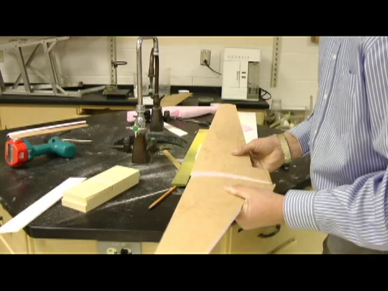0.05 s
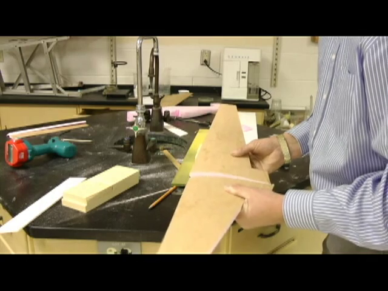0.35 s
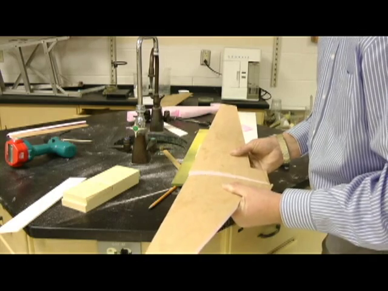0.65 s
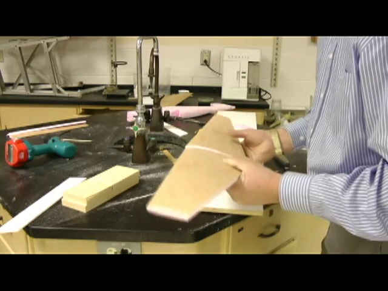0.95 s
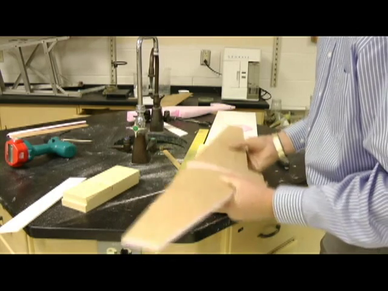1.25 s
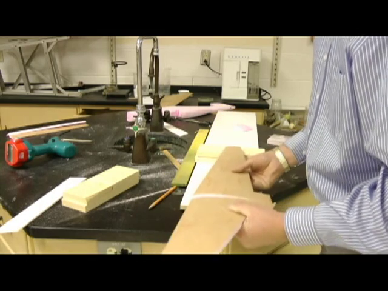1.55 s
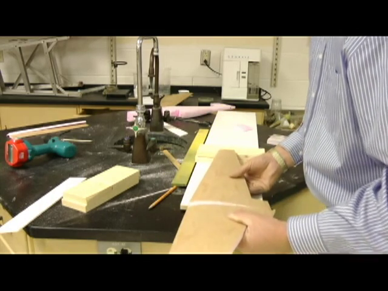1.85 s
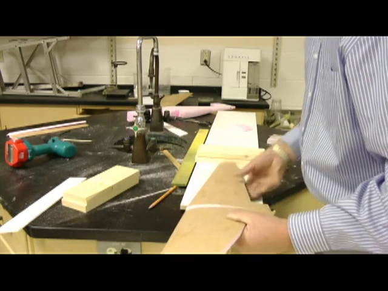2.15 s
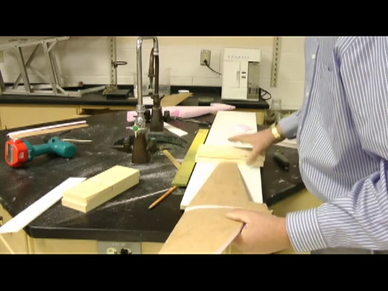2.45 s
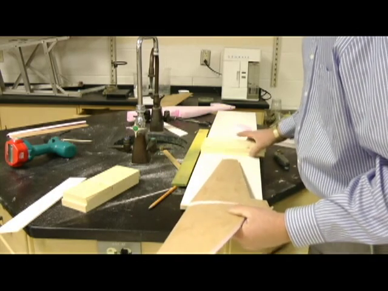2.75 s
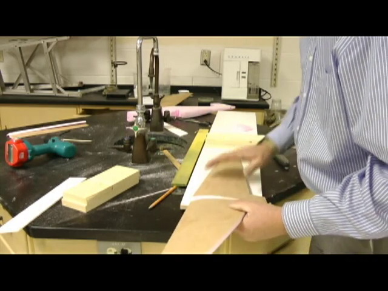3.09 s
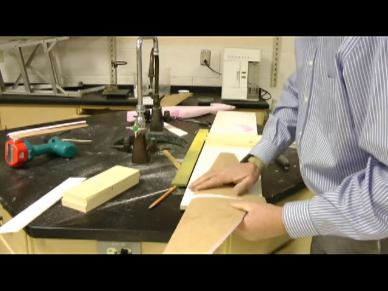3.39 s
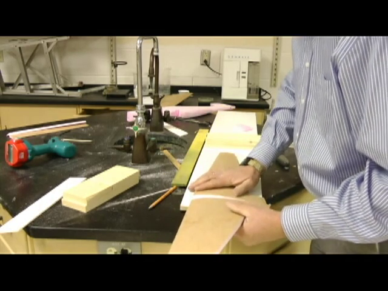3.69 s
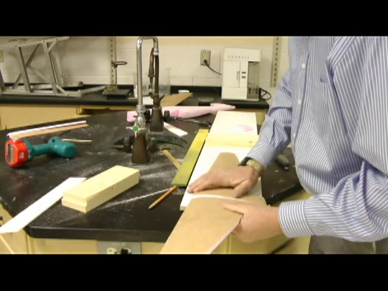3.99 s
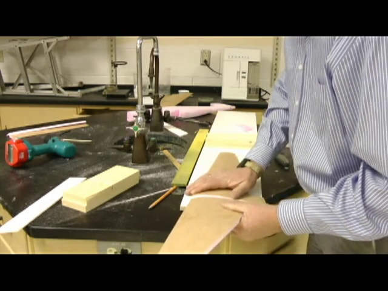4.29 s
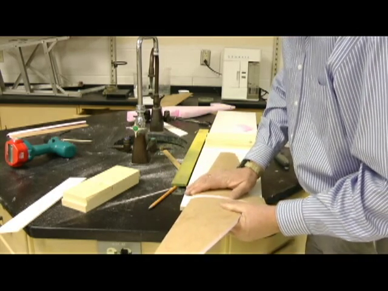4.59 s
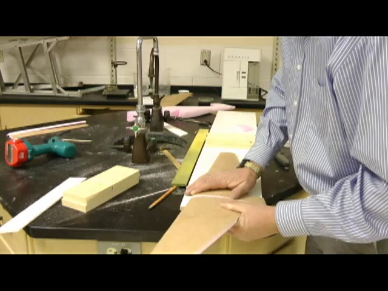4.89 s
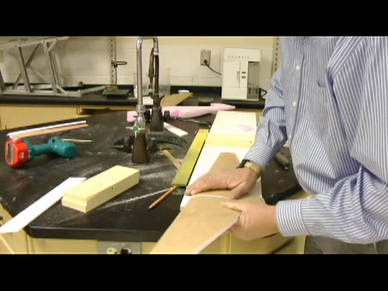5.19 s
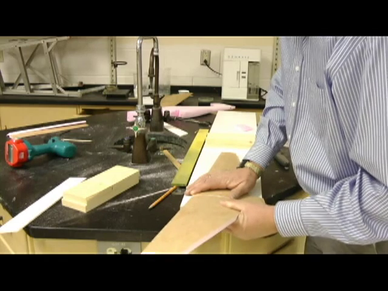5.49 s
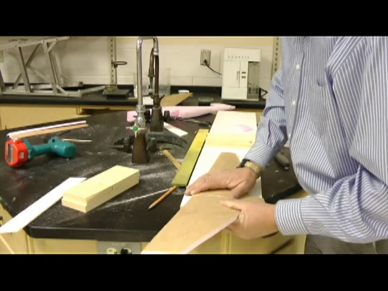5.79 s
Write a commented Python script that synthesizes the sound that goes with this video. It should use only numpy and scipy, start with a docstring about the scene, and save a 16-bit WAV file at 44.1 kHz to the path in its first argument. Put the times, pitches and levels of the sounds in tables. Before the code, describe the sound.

A low, steady ventilation hum fills a small workshop with little echo. Nearby and slightly to the right, hands rub and shift foam panels in short, uneven strokes that make a dry, grainy rasp. Small ticks dot the first half second, and faint high squeaks come just after 1 second. Light bumps follow around 1.6 seconds, then a soft thump with a click at 2.2. A panel drags briefly over the bench and knocks sharply twice, at about 2.8 and 2.9 seconds, the loudest moments. The rubbing carries on in small pushes. From about 4.3 to 5.1 seconds, wooden pins tick and creak in short runs as they work into the foam. At 5.3 seconds the joint closes with a thin squeak, a bright crunch and a hollow thump. A few lighter ticks and one more brief rub follow near 5.8 seconds.

```python
"""Foam wing panels are rubbed, handled on a workshop bench and pushed together on wooden pins.
Friction snaps countless foam cells past each other, giving a grainy hiss and exciting the panel's bending modes.
Stick-slip motion makes the pins tick and creak and the foam squeak. A panel is dragged and knocks, each impact
ringing damped modes, and the joint shuts with a crunch and a hollow thump. Ventilation hums in the room."""
import sys
import numpy as np
from scipy import signal
from scipy.fft import rfft, irfft
from scipy.io import wavfile
from scipy.ndimage import uniform_filter1d

SR = 44100
rng = np.random.default_rng(int(sys.argv[2]) if len(sys.argv) > 2 else 0)


def waveform_to_disk(signal):
    """Save audio, clipped to [-1, 1], as 16-bit WAV at the path in sys.argv[1]."""
    frames = np.transpose(np.atleast_2d(signal))
    scaled = np.clip(frames, -1, 1) * 32767
    samples = np.round(scaled).astype(np.int16)
    wavfile.write(sys.argv[1], SR, samples)


N = 261954
TIME = np.arange(N) / SR
CUTOFF_HZ = 16000

# Ventilation spectrum. Each row: frequency in Hz, relative spectral density in dB.
VENT_SPECTRUM = [(25, -13), (65, 2.5), (110, -1.5), (260, 2.5), (400, -3.5), (580, -17.5), (745, -6),
                 (920, -28), (2600, -22.5), (16000, -38)]
# Phase of the ventilation between channels. Each row: frequency in Hz, lead of the right in radians.
VENT_RIGHT_LEAD = [(60, 0.097), (500, 2.05), (3500, 2.9)]
# Balance of the ventilation. Each row: frequency in Hz, left minus right level in dB.
VENT_LEFT_EXCESS = [(90, 1.5), (260, -3.5), (2000, -16)]
# Foam and pins catch and let go. Each row: start in seconds, level in dB, ring frequency in Hz,
# crack level in dB above the ring.
CATCH_TICKS = [(0.046, -38.5, 3840, -7), (0.2533, -50, 3860, -11), (0.2864, -36, 9100, 3),
               (0.423, -36, 3300, -10), (1.6867, -40.5, 2260, -26), (2.2469, -28.5, 2880, -50),
               (3.8698, -45, 9200, 10.5), (3.9115, -43, 9000, 3.5), (4.3701, -34.5, 2890, -11),
               (4.5917, -37, 3600, -24), (4.8134, -37, 4200, -16), (4.917, -35.5, 3350, -27),
               (5.088, -42, 4120, -11), (5.1208, -42, 4730, 0.5), (5.317, -25.5, 6640, -5),
               (5.3263, -22.5, 3420, -10), (5.3927, -35, 3940, -14), (5.6304, -40.5, 3820, -33),
               (5.7699, -41, 2680, -36), (5.833, -40, 3320, -30), (5.8779, -32.5, 4420, -10.5)]
# Runs of slips as a pin creeps in. Each row: start in seconds, length in seconds, slips per second,
# level in dB, ring frequency in Hz, crack level in dB above the ring.
PIN_CREEPS = [(4.323, .034, 71, -40, 2840, -7), (4.435, .132, 86, -49, 4240, -30),
              (4.741, .06, 48, -43, 3080, -4), (4.862, .1, 38, -46.5, 4740, -5)]
# Pushes of hand on foam. Each row: start, build-up and easing times in seconds, rasp level in dB,
# hiss level and panel resonance level, both in dB above the rasp.
HAND_STROKES = [(0.074, 0.067, 0.045, -47.5, -4, -12), (0.283, 0.012, 0.063, -41.5, -7, -10),
                (0.41, 0.047, 0.17, -52, -0.5, -10), (0.536, 0.013, 0.032, -45.5, -6.5, -2),
                (0.781, 0.0092, 0.079, -49.5, -3, -2), (0.848, .015, 0.069, -43.5, -3.5, -5.5),
                (0.954, .08, 0.12, -39.5, -5, -5.5), (1.17, 0.12, 0.063, -55, -3, -2),
                (1.35, 0.03, 0.45, -56, -4, -0.5), (1.556, .012, 0.054, -47, -10, 5),
                (1.679, 0.013, 0.036, -51.5, -7.5, 7), (1.792, 0.18, .04, -46.5, -5.5, 0),
                (2.0, 0.061, 0.096, -56, -6.5, -0.5), (2.153, 0.036, 0.033, -52, -6, 3),
                (2.248, 0.0042, 0.094, -44, -9.5, -0.5), (2.36, 0.016, .15, -56.5, -4, -3.5),
                (2.53, 0.028, 0.067, -54, -1, -5), (2.61, 0.026, 0.035, -44, -8.5, 4),
                (2.711, 0.13, 0.16, -41, -11.5, 5.5), (2.999, 0.039, 0.083, -43.5, -11.5, -5),
                (3.168, 0.064, 0.14, -48, -5, -7), (3.37, 0.021, 0.15, -52, -0.5, -4),
                (3.615, 0.051, 0.06, -44, -3.5, -2.5), (3.798, 0.036, 0.026, -46.5, -2.5, -4),
                (3.88, 0.062, 0.082, -46, -3, -4.5), (4.01, 0.12, .14, -45.5, -3, -5.5),
                (4.337, 0.044, 0.046, -47.5, -4.5, -2), (4.42, 0.037, 0.26, -58, -6.5, -6),
                (4.69, 0.055, 0.066, -51, -8, -5.5), (4.805, 0.066, 0.12, -49.5, 0, -13),
                (5.125, 0.047, 0.0062, -41.5, -4.5, -5.5), (5.19, 0.13, 0.095, -51.5, 3.5, -11.5),
                (5.32, 0.014, 0.023, -43, 3.5, 3.5), (5.39, .01, 0.14, -52.5, -8, -12),
                (5.63, .01, 0.42, -64, -4.5, -6.5), (5.85, 0.042, .07, -50.5, -1.5, -0.5)]
# How unevenly the surfaces catch. Each row: time in seconds, spread of grain sizes in dB.
GRAIN_SPREAD = [(.5, 5.5), (1, 2.5), (4.2, 1), (4.45, 4), (4.95, 5), (5.2, 4.5)]
# Bending modes of a rubbed panel. Each row: frequency in Hz, bandwidth in Hz, relative level in dB.
BENDING_MODES = [(1405, 39.4, 6.5), (1777, 105, 6), (1990, 144, 8), (2450, 427, 9), (2966, 2050, -2)]
# Soft blows of a panel on the bench. Each row: start in seconds, force level in dB, contact cut-off in Hz.
BENCH_BLOWS = [(0.287, -44, 1290), (1.56, -43, 1200), (1.688, -44, 1300), (2.246, -34.5, 1800),
               (2.252, -25, 148), (2.778, -38, 2000), (2.899, -42, 1500), (2.942, -22.5, 90),
               (4.371, -48, 1200), (5.3315, -24.5, 606), (5.371, -34.5, 494), (5.77, -46, 1000)]
# Low modes of a panel on the bench. Each row: frequency in Hz, gain in dB, 60 dB decay time in seconds.
LOW_MODES = [(82.5, -17.5, 0.21), (160, -5.5, 0.04), (219, -1, 0.022), (324, 0, 0.028), (400, -10.5, 0.062),
             (582, -11.5, 0.061), (762, -15, 0.049), (1102, -8, 0.012)]
# Scraping of a panel dragged over the bench. Each row: time in seconds, level in dB.
DRAG_LEVEL = [(2.5, -76.5), (2.76, -56), (2.79, -46), (2.86, -63), (2.91, -44), (2.96, -54.5),
              (3.25, -77.5)]
# Squeaks and crunches of foam. Each row: start in seconds, length in seconds, frequency in Hz,
# bandwidth in Hz, level in dB.
FOAM_SQUEAKS = [(1.108, 0.033, 7600, 1500, -39), (1.158, 0.009, 4600, 300, -45),
                (1.203, 0.023, 7100, 400, -49), (2.726, 0.011, 2180, 398, -50),
                (2.881, 0.0062, 4520, 300, -31), (3.369, 0.0035, 4870, 700, -34.5),
                (5.227, 0.14, 10200, 500, -48.5), (5.322, 0.019, 7000, 7000, -26.5),
                (5.329, 0.0044, 10150, 1100, -22.5)]
# Hard knocks of the joint. Each row: start in seconds, force level in dB, contact cut-off in Hz.
JOINT_BLOWS = [(2.7775, -14.5, 1900), (2.8977, -11.5, 4840), (5.3245, -33, 3000)]
# Modes of the joint. Each row: frequency in Hz, gain in dB, 60 dB decay time in seconds.
JOINT_RESONANCES = [(740, -14, 0.032), (2023, 9, 0.0099), (2230, 10, 0.0024), (2770, 0.5, 0.0096),
                    (3500, 0.5, 0.017), (4720, -14, 0.046)]


def from_db(db):
    """Amplitude ratio of a level in decibels."""
    return 10 ** (np.asarray(db) / 20)


def rms_one(x):
    """Normalisation to unit rms."""
    return x / np.sqrt(np.mean(x ** 2) + 1e-20)


def in_time(points):
    """Linear interpolation of a curve at every sample."""
    return np.interp(TIME, *np.transpose(points))


def at_hz(points, hz):
    """Interpolation of a spectrum on a log-frequency axis."""
    known_hz, values = np.transpose(points)
    return np.interp(np.log(hz + 1), np.log(known_hz), values)


def add(track, start_s, sound):
    """Superposition of a short sound on a track."""
    at = round(start_s * SR)
    track[at:at + len(sound)] += sound[:N - at]


def butter(x, hz, kind, order=2):
    """Maximally flat low-, high- or band-pass filtering."""
    return signal.sosfilt(signal.butter(order, hz, kind, fs=SR, output="sos"), x + 1e-18)


def resonance(x, hz, width_hz):
    """Forced response of a two-pole resonator with unit peak gain."""
    r = np.exp(-np.pi * width_hz / SR)
    feedback = [1, -2 * r * np.cos(2 * np.pi * hz / SR), r * r]
    return signal.lfilter(np.array([1, 0, -1]) * (1 - r * r) / 2, feedback, x + 1e-18)


def ring(force, modes):
    """Modal superposition: an impulse excites one damped sinusoid per mode, in alternating signs."""
    out = 0
    for k, (hz, db, t60) in enumerate(modes):
        r, w = np.exp(-np.log(1000) / (t60 * SR)), 2 * np.pi * hz / SR
        mode = signal.lfilter([0, np.sin(w)], [1, -2 * r * np.cos(w), r * r], force + 1e-18)
        out = out + (-1) ** k * from_db(db) * mode
    return out


def drift(hz, hop=100):
    """Slow random modulation: low-passed noise of unit rms."""
    slow = butter(rng.standard_normal(N // hop + SR // hop), hz * hop, "low")[-(N // hop):]
    return np.interp(np.arange(N) / hop, np.arange(len(slow)), rms_one(slow))


def ventilation(level_db=-53, own_db=-10):
    """Partial coherence: steady air noise leads on the right, and each channel has a little of its own."""
    hz = np.fft.rfftfreq(N, 1 / SR)
    side = np.array([[1], [-1]])
    shared = rfft(rng.standard_normal(N)) * np.exp(-1j * side * at_hz(VENT_RIGHT_LEAD, hz) / 2)
    field = shared + from_db(own_db) * rfft(rng.standard_normal((2, N)))
    colour = from_db(at_hz(VENT_SPECTRUM, hz) + side * at_hz(VENT_LEFT_EXCESS, hz) / 2)
    return from_db(level_db) * rms_one(irfft(field * colour, N))


def tick(db, hz, crack_db, rattle_s=0.00052, crack_s=0.0015):
    """Transient excitation: a burst of snapping cells rings the nearby foam under a bright crack."""
    t = TIME[:SR // 50]
    burst = rng.standard_normal(len(t))
    body = resonance(burst * np.exp(-t / rattle_s), hz, width_hz=1100)
    body = butter(body, 2300, "high", order=3)
    crack = butter(burst * np.exp(-t / crack_s), (5500, 13000), "band")
    attack = SR // 333  # the first 3 ms set the level
    return from_db(db) * (body / np.std(body[:attack]) + from_db(crack_db) * crack / np.std(crack[:attack]))


def ticking(gap_jitter=0.078, jitter_db=1.5):
    """Stick-slip motion: single catches tick, and a creeping pin creaks in nearly periodic slips."""
    out = np.zeros(N)
    for start, db, hz, crack_db in CATCH_TICKS:
        add(out, start, tick(db, hz, crack_db))
    for start, length, per_s, db, hz, crack_db in PIN_CREEPS:
        gaps = (1 + gap_jitter * rng.standard_normal(20)) / per_s
        for delay in np.cumsum(gaps) - gaps[0]:
            slip = tick(db + jitter_db * rng.standard_normal(), hz, crack_db)
            add(out, start + delay, (delay < length) * slip)
    return out


def strokes(swell_db=6, sag_db=10, release_db_per_s=399):
    """Incoherent addition: arching strokes sum in power to give the gains of rasp, hiss and panel."""
    power = np.zeros((3, N))
    for start, build_s, ease_s, db, hiss_db, panel_db in HAND_STROKES:
        first = max(start - 2 * build_s, 0)
        count = int((3 * build_s + ease_s) * SR) + SR // 5
        t = TIME[:count] + first - start - build_s  # zero at the top of the push
        arch_db = -swell_db * np.minimum(t / build_s, 0) ** 2 - sag_db * np.clip(t / ease_s, 0, 1) ** 2
        push_db = db + arch_db - release_db_per_s * np.maximum(t - ease_s, 0)
        for track, share_db in zip(power, (0, hiss_db, panel_db)):
            add(track, first, from_db(push_db + share_db) ** 2)
    return np.sqrt(power)


def grains(spread_db, per_s=7000, smooth_share=0.31):
    """Shot noise: foam cells snap past each other in dense, uneven clicks over a smooth hiss."""
    sizes = from_db(spread_db * np.minimum(rng.exponential(1, N), 6)) * rng.choice([-1, 1], N)
    clicks = sizes * (rng.random(N) < per_s / SR)
    local_rms = np.sqrt(np.abs(uniform_filter1d(clicks ** 2, SR // 25)) + 1e-9)
    return rms_one(clicks / local_rms + smooth_share * rng.standard_normal(N))


def shifting_modes(x, low_hz=1300, favour_db=2.03, shift_hz=14, count=40):
    """Modal coupling: a moving contact favours now some, now others of a foam sheet's close modes."""
    pitches = np.geomspace(low_hz, CUTOFF_HZ, count)
    return sum((-1) ** k * from_db(favour_db * drift(shift_hz)) * resonance(x, hz, width)
               for k, (hz, width) in enumerate(zip(pitches, np.gradient(pitches))))


def judder(per_s=28, settle_s=0.013):
    """Relaxation: a stroke lets go suddenly at random moments and settles; zero mean, unit rms."""
    releases = (rng.random(N) < per_s / SR) * rng.random(N)
    surge = np.sqrt(signal.lfilter([1], [1, -np.exp(-1 / (settle_s * SR))], releases))
    return rms_one(surge - surge.mean())


def rubbing(rasp_gain, hiss_gain, panel_gain, judder_db=2.0, waver_db=2, waver_hz=10.7):
    """Friction noise: uneven grains rasp and hiss while steadier ones drive the panel's bending modes."""
    slips = shifting_modes(grains(in_time(GRAIN_SPREAD)))
    rasp = butter(slips, (2750, 6400), "band", order=3)
    rasp = butter(rasp, 3800, "low", order=1)
    hiss = butter(slips, (7000, 16500), "band", order=3)
    hiss = butter(hiss, 7500, "low", order=1)
    friction = grains(spread_db=1.9)
    panel = sum((-1) ** k * from_db(db + waver_db * drift(waver_hz)) * resonance(friction, hz, width)
                for k, (hz, width, db) in enumerate(BENDING_MODES))
    panel = butter(panel, 1070, "high", order=4)  # a light panel radiates little below its bending modes
    rub = rasp_gain * rms_one(rasp) + hiss_gain * rms_one(hiss) + panel_gain * rms_one(panel)
    return from_db(judder_db * judder()) * rub


def scraping(panel_gain, rub_leak_db=-19):
    """Forced vibration: dragging, and a little of all rubbing, shakes the panel's low modes."""
    vibration = ring(grains(in_time(GRAIN_SPREAD)), LOW_MODES)
    push = from_db(in_time(DRAG_LEVEL)) + from_db(rub_leak_db) * panel_gain
    return push * rms_one(butter(vibration, 650, "high"))


def blows(rows):
    """Contact force: the softer the contact, the longer the pulse and the duller its spectrum."""
    force = np.zeros(N)
    for start, db, contact_hz in rows:
        add(force, start, from_db(db) * butter(signal.unit_impulse(SR // 10), contact_hz, "low"))
    return force


def thumps(settle_s=0.014, settle_db=-27):
    """Multiple impact: a wide panel never lands flat, so each blow and its settling ring the low modes."""
    t = TIME[:SR // 10]
    settling = from_db(settle_db) * rng.standard_normal(len(t)) * np.exp(-t / settle_s)
    landing = signal.unit_impulse(len(t)) + settling
    return ring(signal.fftconvolve(blows(BENCH_BLOWS), landing)[:N], LOW_MODES)


def squeaks(low_hz=800, taper_share=0.033):
    """Frictional resonance: fast slipping locks briefly on a pitch; a wide band makes it a crunch."""
    out = np.zeros(N)
    for start, length, hz, width_hz, db in FOAM_SQUEAKS:
        count = int(length * SR)
        tone = resonance(rng.standard_normal(SR // 2), hz, width_hz)
        # the smaller and higher the slipping patch, the less bass it radiates
        tone = butter(tone, np.sqrt(low_hz * hz), "high", order=4)[-count:]
        add(out, start, from_db(db) * rms_one(tone) * signal.windows.tukey(count, taper_share))
    return out


def knocks():
    """Free vibration: hard blows ring the joint's heavily damped modes."""
    return ring(blows(JOINT_BLOWS), JOINT_RESONANCES)


def room(x, scatter_s=0.051, scatter_db=-22.5, t60_s=0.26, tail_db=-12.5):
    """Reverberation: bench scatter common to both channels, and a dull diffuse tail separate in each."""
    t = TIME[:SR // 2]
    scatter = rng.standard_normal(len(t)) * np.exp(-t / scatter_s)
    tail = butter(rng.standard_normal((2, len(t))), 7000, "low", order=1)
    tail *= np.exp(-np.log(1000) * t / t60_s)
    response = (from_db(scatter_db) * rms_one(scatter) + from_db(tail_db) * rms_one(tail)) / np.sqrt(len(t))
    return x + signal.fftconvolve(x[None], response, axes=1)[:, :N]


def scene(pan_db=6, shade_hz=16000):
    """Level difference: the work lies to the right, so the left channel is weaker and slightly duller."""
    rasp_gain, hiss_gain, panel_gain = strokes()
    foam = rubbing(rasp_gain, hiss_gain, panel_gain) + ticking() + squeaks()
    foam += scraping(panel_gain) + thumps() + knocks()
    left, right = room(foam) * from_db([[-pan_db / 2], [pan_db / 2]])
    return np.array([butter(left, shade_hz, "low", order=1), right]) + ventilation()


def record(dry):
    """Band limiting: a steep elliptic low-pass removes the highest treble."""
    return signal.sosfilt(signal.ellip(10, .2, 80, CUTOFF_HZ, fs=SR, output="sos"), dry)


dry = scene()
out = record(dry)
waveform_to_disk(out)
```